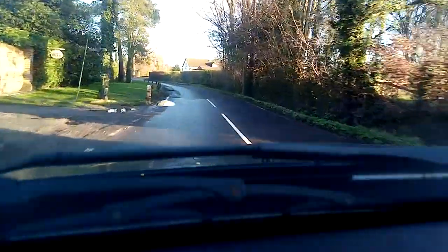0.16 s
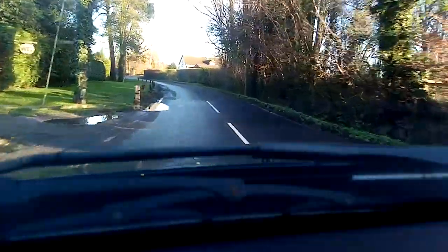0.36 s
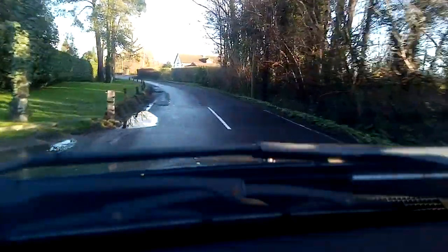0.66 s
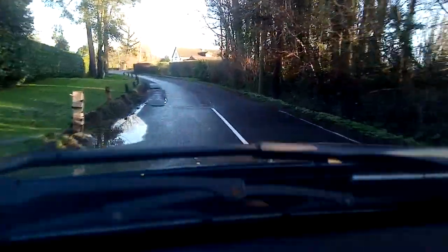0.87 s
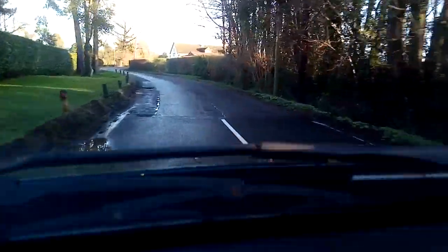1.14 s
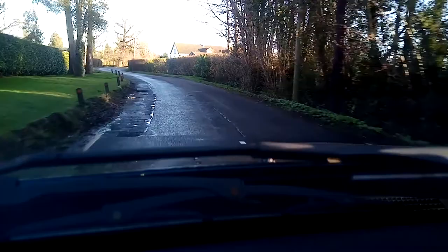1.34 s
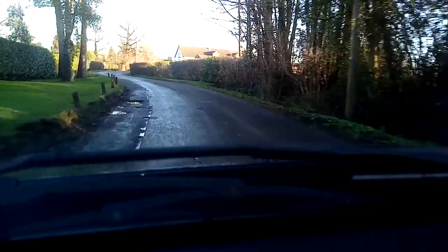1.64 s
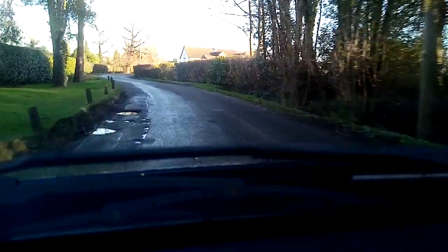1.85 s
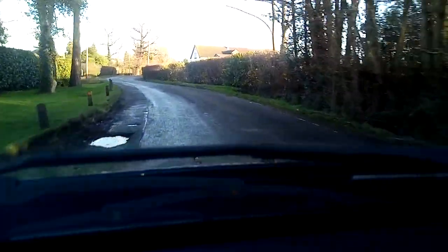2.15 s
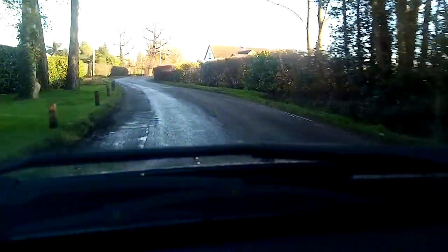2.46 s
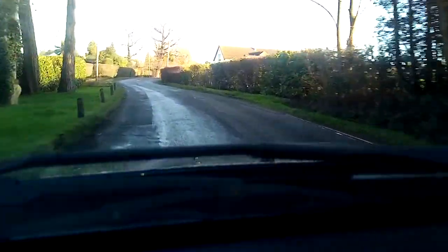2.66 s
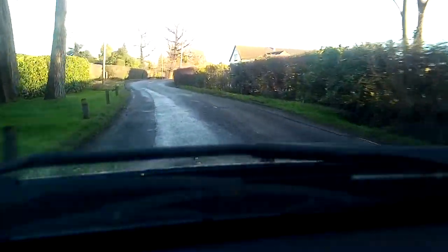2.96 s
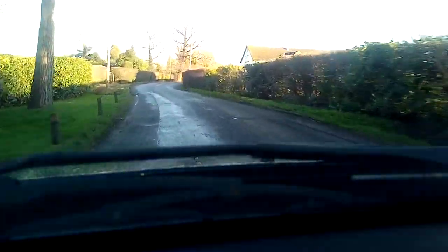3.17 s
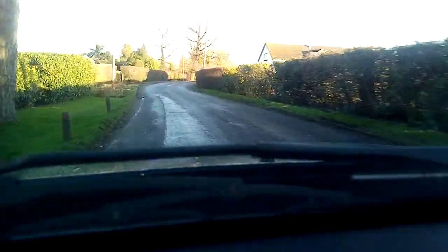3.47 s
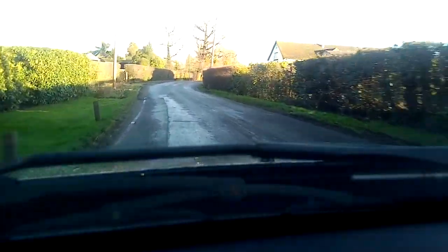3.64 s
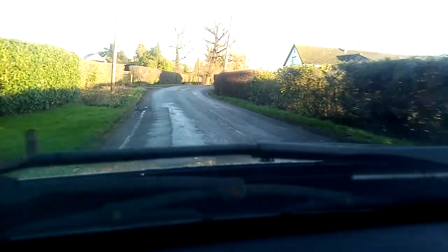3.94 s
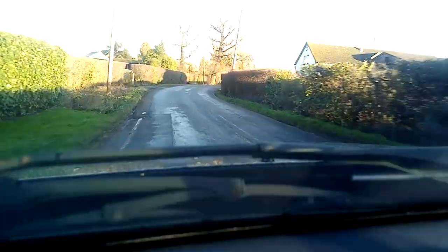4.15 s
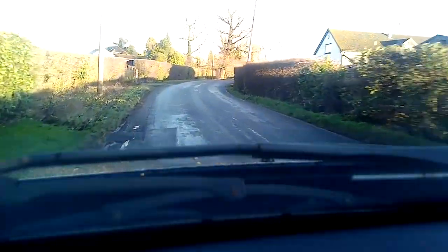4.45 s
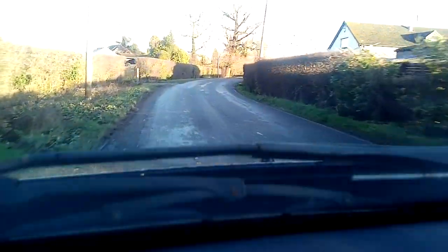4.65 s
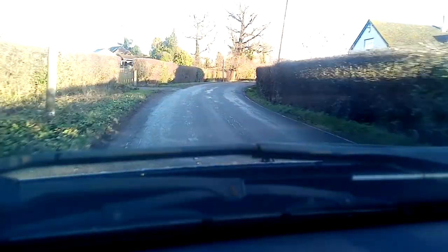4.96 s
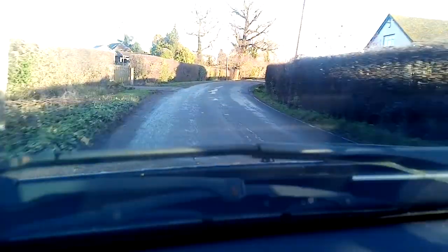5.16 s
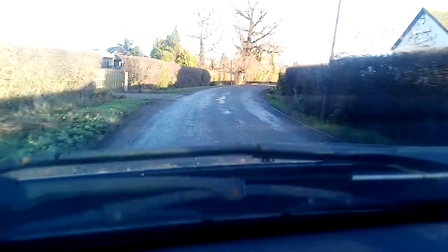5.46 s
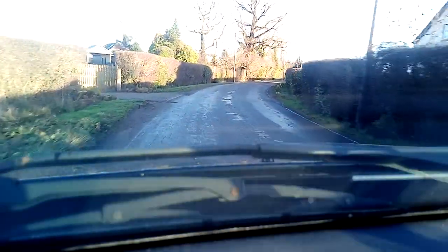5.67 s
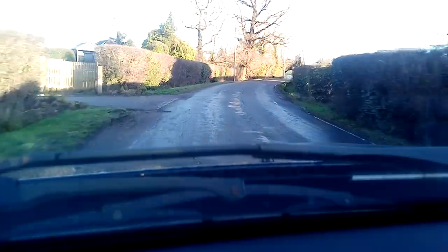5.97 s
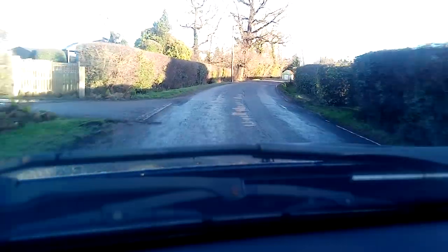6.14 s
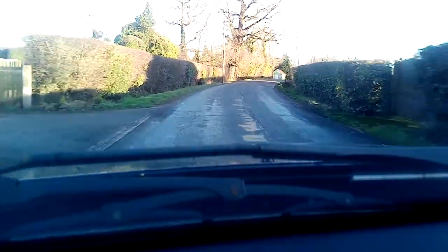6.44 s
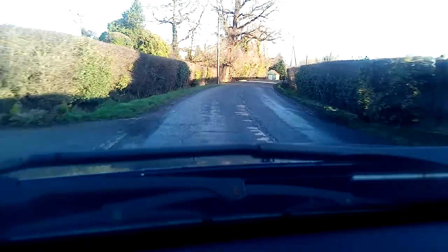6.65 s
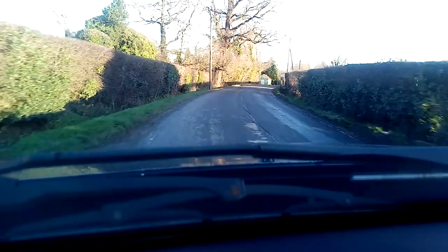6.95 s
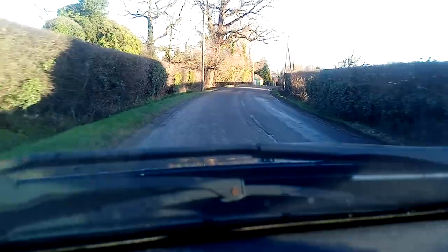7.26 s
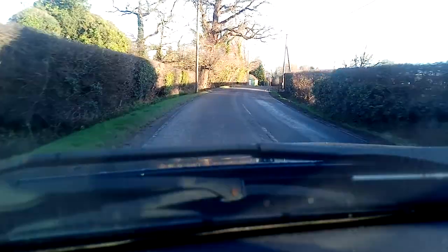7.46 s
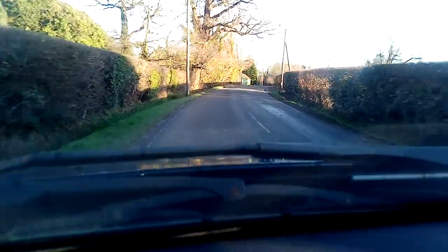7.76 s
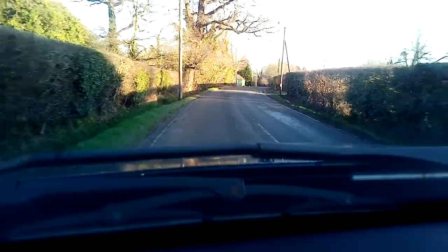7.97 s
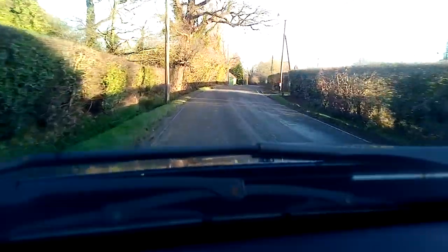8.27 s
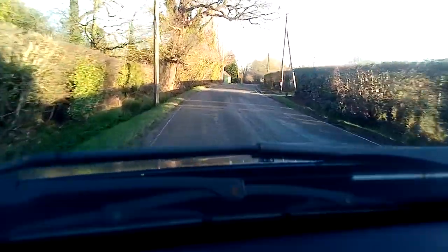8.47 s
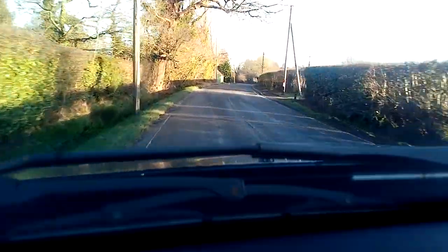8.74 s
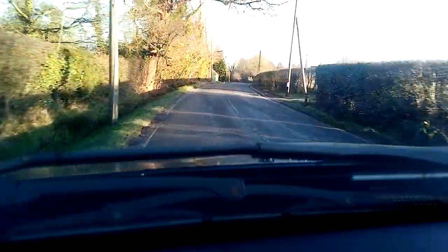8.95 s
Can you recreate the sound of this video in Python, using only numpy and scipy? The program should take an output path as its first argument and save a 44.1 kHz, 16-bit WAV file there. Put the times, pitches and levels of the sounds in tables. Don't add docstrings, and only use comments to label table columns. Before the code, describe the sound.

Heard from a small microphone on the windscreen inside a car on a country road: low tyre rumble and cabin boom, softer at first. Just before two seconds the rough surface makes it surge, with a cluster of sharp snaps from the camera mount and ticking trim. More snaps come between three and four seconds, then uneven rumble continues with faint plastic buzz.

```python
import sys
import numpy as np
from scipy import signal
from scipy.fft import rfft, irfft, next_fast_len
from scipy.io import wavfile
from scipy.ndimage import uniform_filter1d

SR = 44100
rng = np.random.default_rng(int(sys.argv[2]) if len(sys.argv) > 2 else 0)


def gain_from_db(level_db):
    decades = np.asarray(level_db, float) / 20
    return 10 ** decades


def unload_wav(signal):
    wavfile.write(
        sys.argv[1],
        SR,
        np.round(np.clip(np.atleast_2d(signal).T, -1, 1) * 32767).astype(np.int16),
    )


N = 401751


def rms_one(x):
    return x / np.sqrt(np.mean(x ** 2) + 1e-20)


def at_hz(points, hz):
    point_hz, point_db = np.array(points).T
    return np.interp(np.log(hz + 1), np.log(point_hz), point_db)


def drift(rate_hz):
    r = np.exp(-80 * np.pi * rate_hz / SR)
    slow = signal.lfilter([1], [1, -2 * r, r * r], rng.standard_normal(N // 40 + 2002))[2000:]
    return np.interp(np.arange(N) / 40, np.arange(len(slow)), rms_one(slow))


def resonance(x, hz, width_hz):
    r = np.exp(-np.pi * width_hz / SR)
    zeros = np.array([1, 0, -1]) * (1 - r * r) / 2
    return signal.lfilter(zeros, [1, -2 * r * np.cos(2 * np.pi * hz / SR), r * r], x)


def resonance_twice(x, hz, width_hz):
    return resonance(resonance(x, hz, width_hz), hz, width_hz)


def bell(hz, centre_hz, width_hz):
    return 1 / (1 + (2 * (hz - centre_hz) / width_hz) ** 2)


def patchy_noise(shape, edges_hz, levels_db, patchy_db, rate_hz, steady=0.):
    size = next_fast_len(N)
    log_hz = np.log(np.arange(size // 2 + 1) * SR / size + 1)
    coloured = shape * rfft(rng.standard_normal(size))
    together, out = drift(rate_hz / 2), 0
    for k, hz in enumerate(edges_hz):
        fade = np.interp(log_hz, np.log(edges_hz), np.arange(len(edges_hz)) == k)
        band = irfft(coloured * fade, size)[:N]
        swell = uniform_filter1d(band ** 2, size=4000) / np.mean(band ** 2) + 0.0067
        band = band / swell ** (steady / 2)
        flicker = np.minimum(1.8 * together + drift(rate_hz), 1.1)
        out = out + band * gain_from_db(levels_db(hz) + patchy_db(hz) * flicker)
    return out


# t/s, unevenness/dB, coarseness/dB, shortness of ripples/(dB/octave)
ROAD_INPUT = [(0, -26.5, -37, 1.8), (.5, -34.5, -37.5, 0.7), (1.2, -30, -37.5, .1), (1.8, -31, -40, -1.5),
              (1.87, -21, -29, -2.8), (2.35, -15.5, -32, 1.2), (2.75, -18, -31, 1), (3.1, -16.5, -32, -1),
              (3.6, -20.5, -31.5, 0), (4.3, -21.5, -31, 0.8), (4.799, -25, -33.5, 1),
              (5.7, -24.5, -36, 3.5), (6.199, -25.5, -31.5, 1.5), (6.9, -20.5, -31.5, -2.5),
              (7.599, -20.5, -31.5, 0.5), (8.3, -25, -34, 2.5), (8.7, -26.5, -33.5, 1.3),
              (9.11, -24.5, -31, 1.8)]
# mean level/dB, share of unevenness/1, share of coarseness/1, own wander/dB
TRANSFER = [
    (-30, 0.64, 0.08, 1.5),
    (-22, 1.08, 0.011, 2.5),
    (-30, .01, 0.89, 1.68),
    (-37, 0.088, 0.68, 0.66),
    (-65.5, .05, 0.14, -1.3),
    (-78.5, 0.11, 0.092, 0.25),
]


def road():
    s, *columns = np.transpose(ROAD_INPUT)
    uneven_db, coarse_db, tilt_db = [np.interp(np.arange(N) / SR, s, c) for c in columns]
    uneven, coarse = uneven_db + 22, coarse_db + 30
    paths_db = [mean_db + a * uneven + b * coarse + wander_db * drift(5.6)
                for mean_db, a, b, wander_db in TRANSFER]
    return paths_db, tilt_db


# from f/Hz, to f/Hz
PATH_BANDS = [(25, 70), (70, 220), (220, 420), (420, 1450), (1450, 1900)]
# f/Hz, density/(dB/Hz)
BODY_CURVE = [(11, -47), (18, -17), (33, -8.0), (96, -1), (136, -5.5), (235, -16), (298, -13.5),
              (344, -15.5), (377, -19), (487, -22), (543, -27.0), (663, -26.0), (754, -30.5), (1400, -44.5),
              (1820, -72), (3080, -120)][:-2]
# f/Hz, density/(dB/Hz)
TOP_EDGE = [(1500, -46.5), (1620, -50.5), (1770, -57.5), (1830, -68), (2100, -78), (4000, -120)]
# f/Hz, width/Hz, lift/dB
CABIN_MODES = [(47.2, 21, 3.5), (98.5, 18, 4), (128, 4.7, 1.5), (205, 46, 3.5), (276, 15, 5),
               (309.5, 14, 8), (347, 17, 3.5), (492, 12, 4), (559, 36, 3.5), (1017, 15, 7), (1184, 28, 7),
               (1397, 25, 7.5)]


def rumble(paths_db, tilt_db):
    boom_hz = 100
    hz = np.fft.rfftfreq(next_fast_len(N), 1 / SR)
    shape = gain_from_db(at_hz(BODY_CURVE + TOP_EDGE, hz))
    for centre_hz, width_hz, lift_db in CABIN_MODES:
        shape = shape * (1 + (gain_from_db(lift_db) - 1) * bell(hz, centre_hz, width_hz))
    share_db = [10 * np.log10(np.sum(shape[(hz > a) & (hz < b)] ** 2) / len(hz)) for a, b in PATH_BANDS]
    gains_db = np.array(paths_db) - np.array(share_db)[:, None]
    log_centres = np.log([45, 140, 305, 480, 1600])
    edge_hz = np.array([1450, 1600, 1900, 1900])[np.digitize(drift(16), [-1.4, -.5, 9])]

    def level_db(f):
        fades = np.array([np.interp(np.log(f), log_centres, row) for row in np.eye(5)])
        dropped_db = -16 * uniform_filter1d(1. * (f > edge_hz), size=400)
        tipped_db = tilt_db * np.clip(np.log2(f / boom_hz), -1, 1) * (f < 250)
        return fades @ gains_db + dropped_db + tipped_db

    def flicker_db(f):
        return np.interp(f, [700, 1350], [.4, 1.8])

    edges_hz = [30, 50, 75, 110, 160, 225, 305, 390, 600, 1000, 1250, 1430, 1470, 1580, 1620, 1800, 2100]
    return patchy_noise(shape, edges_hz, level_db, flicker_db, rate_hz=31, steady=0.54)


# f/Hz, density/(dB/Hz)
BUZZ_CURVE = [(1180, -30.5), (2000, 2), (2930, -1), (3570, -5), (6430, -13.5), (8120, -19.5),
              (13500, -21.5), (15100, -15.5), (15800, -20)]


def buzz(buzz_db):
    hz = np.fft.rfftfreq(next_fast_len(N), 1 / SR)
    shape = gain_from_db(at_hz(BUZZ_CURVE, hz))
    share_db = 10 * np.log10(np.sum(shape[(hz > 2100) & (hz < 7000)] ** 2) / len(hz))
    usual_db = np.median(buzz_db)

    def follows(f):
        return np.interp(f, [6000, 10000], [1, .4])

    def level_db(f):
        return usual_db - share_db + follows(f) * (buzz_db - usual_db)

    return patchy_noise(shape, np.geomspace(2000, 15000, 6), level_db, lambda f: 0.73 * follows(f),
                        rate_hz=30, steady=.6)


def flecks(buzz_db, per_s=45):
    peak_db = 3.1 * (buzz_db + 77.5) - 31.5 + 3.0 * np.minimum(rng.exponential(1, N), 4)
    clicks = gain_from_db(peak_db) * (rng.random(N) < per_s / SR)
    dealt = rng.integers(0, 12, N)
    out = np.zeros(N)
    for k, hz in enumerate(np.geomspace(1900, 4800, 12)):
        out += resonance_twice(clicks * (dealt == k) + 1e-18, hz, 110) * 2500 / hz
    return out


# block/1, peak level/dB
LARGE_STEPS = [(101, -56), (109, -57), (117, -59), (121, -63), (131, -54), (134, -50), (136, -67),
               (139, -52), (141, -62.5), (144, -58.5), (147, -60), (149, -64), (152, -54), (165, -68),
               (172, -72), (173, -54.5), (175, -57), (180, -66), (189, -65), (193, -67), (199, -66),
               (205, -64), (209, -62), (331, -65), (334, -67), (341, -64), (344, -64), (361, -64),
               (385, -71.5), (390, -68.5)]


def seams(level_db):
    first_s, block_s, audible_share = .0093, .02, .25
    s = np.arange(first_s, N / SR, block_s)
    scatter_db = 6.5 * np.minimum(rng.exponential(1, len(s)), 3)
    peak_db = -78 + 2.2 * (level_db[(s * SR).astype(int)] + 18) + scatter_db
    peak_db = peak_db - 40 * (rng.random(len(s)) > audible_share)
    block, large_db = np.transpose(LARGE_STEPS)
    peak_db[np.round(block).astype(int)] = large_db
    steps = np.full(N, 1e-18)
    steps[((s - .0004) * SR).astype(int)] = gain_from_db(peak_db + 25.5) * rng.choice([-1, 1], len(s))
    ring = resonance_twice(steps, 12000, 1000) + gain_from_db(-20) * resonance(steps, 7000, 9000)
    leaky = np.repeat(rng.random(N // 882 + 1) < .25, 882)[:N]
    leaking = leaky * gain_from_db(2.5 * (level_db + 18) - 69)
    whistle = uniform_filter1d(leaking, size=200) * rng.standard_normal(N)
    return ring + resonance_twice(whistle, 12000, 250)


# t/s, peak level/dB, f/Hz, t60/s
TRIM_TICKS = [(0.105, -66, 2800, .02), (0.135, -62, 2680, 0.06), (1.8957, -62, 2400, 0.024),
              (1.9645, -54, 1730, 0.046), (1.9849, -65, 4500, .04), (2.0804, -50, 9000, 0.0074),
              (2.3401, -70, 2800, .02), (2.423, -63, 4300, 0.027), (2.592, -61, 3500, 0.012),
              (2.7484, -64, 2470, 0.067), (2.8094, -62.5, 4700, 0.04), (2.8347, -62, 2400, 0.037),
              (3.248, -51, 2320, 0.045), (3.33, -55, 2100, 0.071), (3.455, -47.5, 2710, .03),
              (3.464, -59.5, 4460, .05), (3.475, -52, 6050, 0.018), (3.4947, -51, 2220, 0.05),
              (3.5304, -61, 3030, 0.014), (3.555, -59, 1940, 0.091), (3.8447, -68, 4500, .06),
              (3.847, -59, 1900, 0.053), (4.2483, -68, 4340, .04), (4.954, -64, 2440, .025),
              (5.245, -64.5, 4830, .02), (5.8187, -58.5, 4200, .012), (6.531, -61, 4400, 0.0099),
              (7.6081, -65.5, 3530, .015), (8.25, -69, 2700, 0.095), (8.361, -71, 3100, .05)]


def ticks():
    out, t = np.zeros(N), np.arange(3000) / SR
    for s, peak_db, hz, t60_s in TRIM_TICKS:
        burst = rng.standard_normal(len(t)) * gain_from_db(-60 * t / max(t60_s, .004))
        width_hz = 22 / max(t60_s, .01)
        burst = resonance_twice(burst, hz, width_hz) + 0.11 * resonance_twice(
            resonance_twice(burst, hz, width_hz) * 0 + burst, 2800, 3000)
        out[int(max(s, 0) * SR):][:len(t)] += gain_from_db(peak_db) * burst / np.abs(burst).max()
    return out


def scuff_db():
    width_s, most_db, knee_db = 0.041, 3.5, -54.5
    t = np.arange(0, N, 200) / SR
    swell = sum(gain_from_db(db - knee_db) * np.exp(-((t - s) / width_s) ** 2) for s, db, *_ in TRIM_TICKS)
    return np.interp(np.arange(N) / SR, t, most_db * np.tanh(swell))


def halo(x, low_hz, high_hz):
    spread = uniform_filter1d(uniform_filter1d(np.abs(x), size=600), size=600)
    smear = spread * rng.standard_normal(N)
    band = signal.butter(2, [low_hz, high_hz], "band", fs=SR, output="sos")
    tilt = signal.butter(1, [low_hz / 2, low_hz], "band", fs=SR, output="sos")
    return signal.sosfilt(tilt, signal.sosfilt(band, smear))


# t/s, peak level/dB, brightness/dB
MOUNT_SNAPS = [
    (2.0519, -20, -19),
    (2.0887, -24.5, -18.5),
    (2.1274, -53, -14),
    (2.173, -22, -19),
    (2.2013, -25, -26),
    (3.1492, -28.5, -17),
    (3.2296, -28, -14),
    (3.775, -20.5, -21.5),
    (3.9215, -25.5, -22.5),
]
# f/Hz, density/(dB/Hz)
SNAP_COLOUR = [(250, -31), (600, -4.5), (1100, 0.5), (1700, 3), (2300, -4), (3200, -10), (4400, -11.5),
               (6300, -14.5), (7500, -16.5), (9500, -23.5), (12500, -39.5), (14000, -26.5), (14800, -20.5),
               (16500, -21.5)]
# f/Hz, width/Hz, level/dB
HOUSING_BELLS = [(3700, 290, -10), (5430, 520, -21), (6880, 330, -20),
                 (684, 300, 8.5), (1000, 160, -7.5), (1680, 540, -2), (8000, 660, -6)]


def snaps(stiffness=0.53, stages=28.0, lead_s=0.00036):
    size, out = 2048, np.zeros(N)
    hz = np.fft.rfftfreq(size, 1 / SR)
    delay = np.exp(-2j * np.pi * hz / SR)
    allpass = (delay - stiffness) / (1 - stiffness * delay)
    bending = np.exp(1j * stages * np.unwrap(np.angle(allpass)))
    colour_db = at_hz(SNAP_COLOUR, hz)
    for centre_hz, width_hz, db in HOUSING_BELLS:
        colour_db = colour_db + db * bell(hz, centre_hz, width_hz)
    for s, peak_db, bright_db in MOUNT_SNAPS:
        tilt_db = (bright_db + 21.5) * np.clip(np.log2(hz / 3000 + 1e-9) / 0.88, 0, 1)
        snap = np.roll(irfft(gain_from_db(colour_db + tilt_db) * bending * np.exp(-1.3j)), size // 2)
        start = int((s - lead_s) * SR) - size // 2
        out[start:start + size] -= gain_from_db(peak_db + 5.0) * snap / np.abs(snap).max()
    return out + gain_from_db(7.0) * halo(out, 1363, 5700)


def scene():
    (*paths_db, glass_db, buzz_db), tilt_db = road()
    scuff = scuff_db()
    buzz_db = buzz_db + scuff
    glass_db = glass_db + 0.75 * scuff
    mix = rumble(paths_db + [glass_db], tilt_db) + buzz(buzz_db) + flecks(buzz_db) + ticks() + snaps()
    return mix[None]


def low_pass(x):
    return signal.sosfilt(signal.butter(12, 17000, fs=SR, output="sos"), x)


def record(dry):
    cutoff_hz, start_gain, start_s = 16500, .35, .006
    heard = signal.sosfilt(signal.butter(3, 33, "high", fs=SR, output="sos"), dry)
    level_db = 10 * np.log10(uniform_filter1d(heard ** 2, size=880) + 1e-9)
    evened = heard * gain_from_db(2.5 - 0.15 * np.maximum(level_db + 27.0, 0))
    rounded = 0.49 * np.tanh(evened / 0.47) + seams(uniform_filter1d(level_db[0], size=8000))
    cut = signal.sosfilt(signal.cheby2(10, 60, cutoff_hz * 1.04, fs=SR, output="sos"), rounded)
    cut = cut * np.sin(np.minimum(np.arange(N)[::-1] / 200, 1) * np.pi / 2) ** 2
    cut = cut * np.interp(np.arange(N) / SR, [0, start_s], [start_gain, 1])
    return low_pass(cut)


dry = scene()
out = record(dry)
unload_wav(out)
```